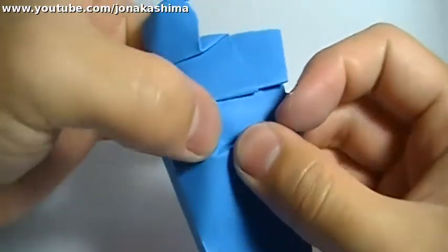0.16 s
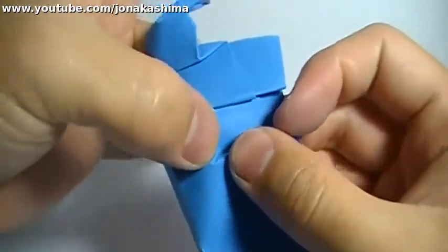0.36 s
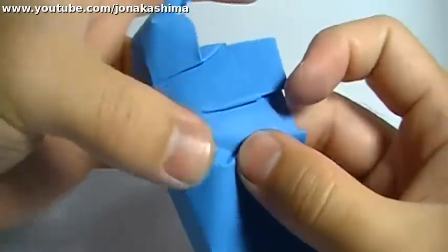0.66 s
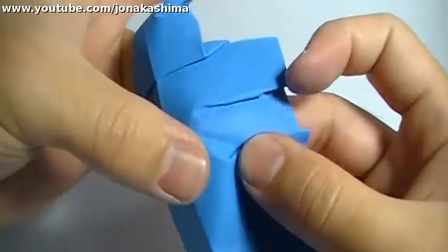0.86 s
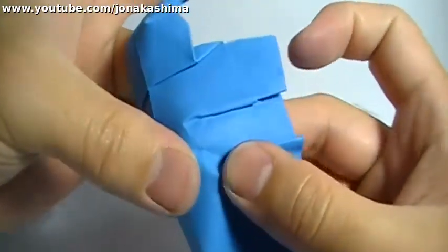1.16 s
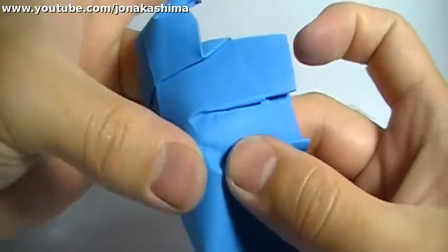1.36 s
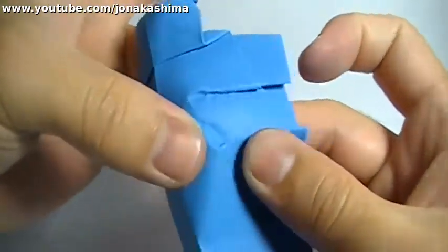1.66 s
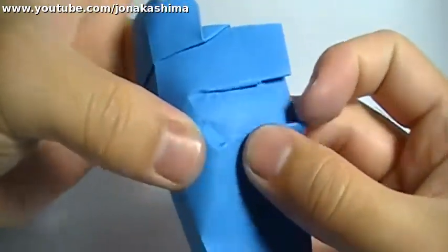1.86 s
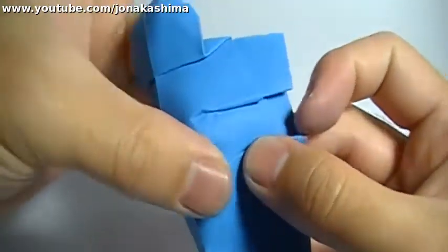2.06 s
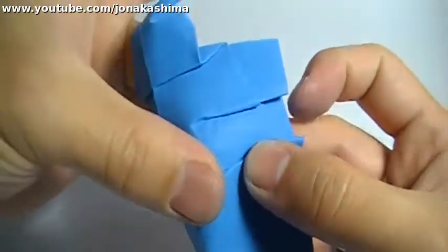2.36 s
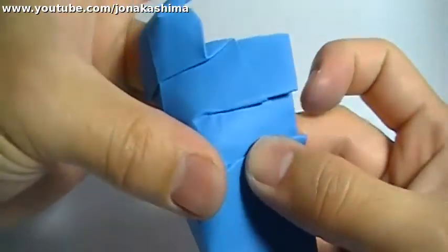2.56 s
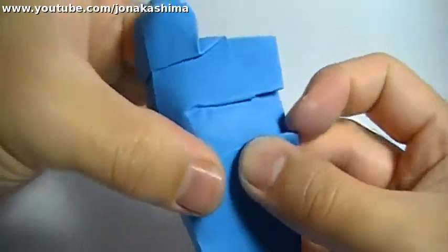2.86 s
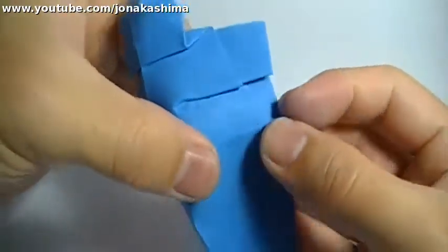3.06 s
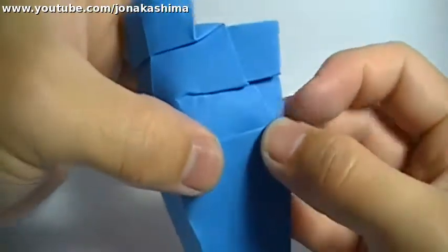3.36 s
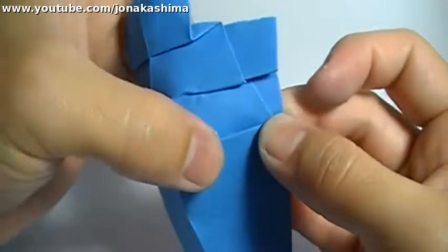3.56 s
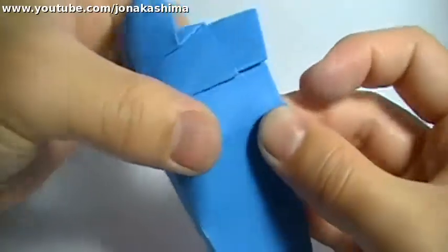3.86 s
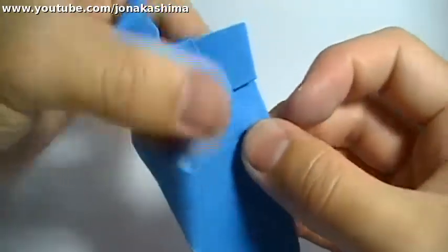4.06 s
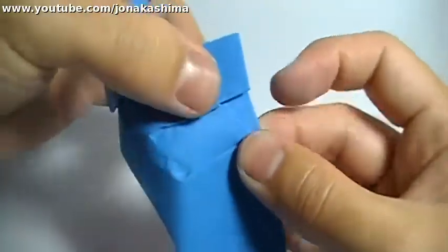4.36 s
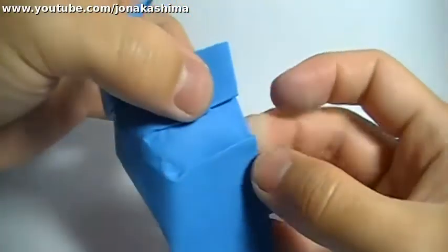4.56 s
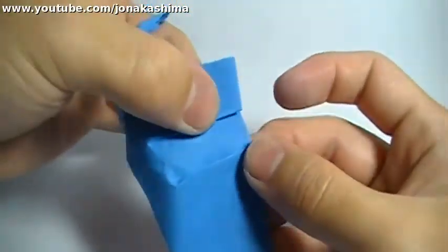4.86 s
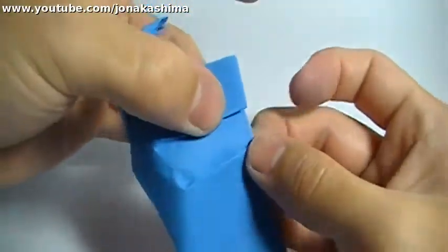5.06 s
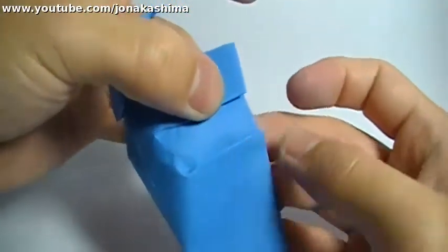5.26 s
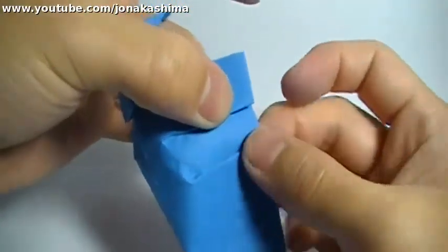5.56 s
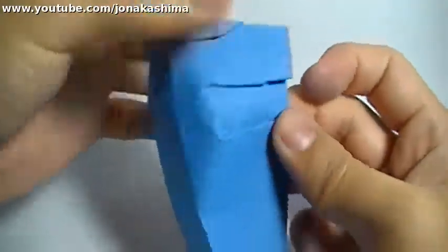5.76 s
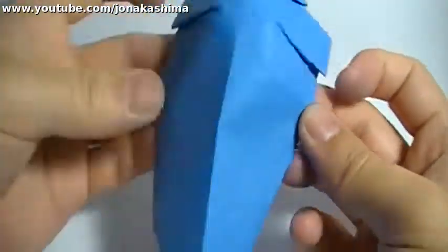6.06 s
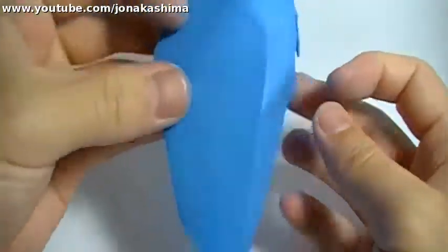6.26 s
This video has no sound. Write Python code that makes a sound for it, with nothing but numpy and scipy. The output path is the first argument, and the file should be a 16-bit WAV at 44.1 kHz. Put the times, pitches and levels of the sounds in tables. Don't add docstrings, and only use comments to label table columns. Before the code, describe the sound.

Close to a small stereo microphone in a quiet room, fingers work a hollow folded paper model. Short dry rubs and crinkles come in irregular clusters, with crisp snaps as creases buckle and tiny fibre ticks. Strong pops land near the middle, the sharpest about two thirds through, then rustling grows again at the end. A low, wide hiss stays underneath.

```python
import sys
import numpy as np
from scipy import signal
from scipy.fft import rfft, irfft
from scipy.io import wavfile

SR = 44100
rng = np.random.default_rng(int(sys.argv[2]) if len(sys.argv) > 2 else 0)


def put_to_file(sound):
    columns = np.atleast_2d(sound).T
    safe = np.clip(columns, -1, 1)
    whole_steps = np.round(safe * 32767)
    wavfile.write(sys.argv[1], SR, whole_steps.astype(np.int16))


def invert_db(x):
    u = np.asarray(x, float) / 20
    return 10 ** u


N = 282681

# start in seconds, length in seconds,
# skin hiss at landing in dB, skin hiss at lifting in dB, bending in dB.
EDGE_STROKES = [(0.56, 0.06, -62, -65, -11), (0.608, 0.084, -48, -55, -10), (4.427, 0.038, -51, -52, -8.5),
                (4.48, 0.042, -62, -59.5, -3.5), (0.876, .012, -37.5, -59, 11),
                (0.9, 0.056, -56.5, -48, -0.5), (1.545, 0.023, -73, -56, -6),
                (1.567, 0.033, -53.5, -64, -5.5), (1.9285, 0.003, -31.5, -67, 6),
                (2.81, 0.11, -55.5, -45, 3.5), (2.898, 0.072, -49, -45, -20), (2.974, 0.039, -47, -49, -8),
                (3.022, 0.034, -67, -59.5, -0.5), (6.038, 0.035, -52.5, -51, 3.5),
                (6.078, 0.024, -49, -53, 2), (6.114, 0.11, -56.5, -68, -0.5),
                (6.2, 0.14, -61.5, -52.5, -19), (6.358, 0.089, -58.5, -54, -8.5)]
# start in seconds, length in seconds,
# skin hiss at landing in dB, skin hiss at lifting in dB, bending in dB.
FACE_STROKES = [
    (0.026, 0.034, -47, -44, -4.5),
    (0.132, 0.074, -70, -65, -11),
    (0.513, 0.032, -57, -53, 1),
    (0.945, 0.041, -48, -50.5, 4),
    (4.39, 0.0037, -32, -56, 27.5),
    (4.396, 0.027, -43, -58, 9),
    (5.788, 0.18, -80.5, -53, 3),
    (2.454, 0.12, -76.5, -71, -22),
]
# start in seconds, length in seconds,
# skin hiss at landing in dB, skin hiss at lifting in dB, bending in dB.
FLAP_STROKES = [(0.696, 0.011, -48.5, -35, -4), (0.709, 0.034, -38.5, -44.5, -4),
                (0.9912, .007, -32, -48, 15), (0.997, 0.033, -81, -51.5, 7.5),
                (1.634, 0.018, -62.5, -39, 9.5), (1.661, 0.034, -40.5, -51, 0.5),
                (1.768, .02, -59.5, -54, -8), (1.78, 0.026, -50.5, -52, 7), (1.992, 0.048, -73, -63, -5),
                (2.037, 0.098, -66.5, -58, 0), (2.64, 0.05, -67, -58, -7), (2.715, 0.025, -47, -52.5, 2),
                (3.713, 0.075, -68, -50, 1), (3.816, 0.036, -47.5, -44, -3.5), (3.846, .05, -50, -59, -13),
                (3.961, 0.053, -66, -61, 0.5), (4.253, 0.055, -53.5, -62, -4.5),
                (4.299, 0.028, -72, -61, 2), (5.061, 0.03, -56.5, -63, 3), (5.096, .036, -67, -56.5, -8),
                (5.122, 0.026, -69, -59, 0.5), (5.68, 0.026, -55, -62, 8), (5.706, 0.019, -64, -50.5, 1)]
# start in seconds, length in seconds,
# skin hiss at landing in dB, skin hiss at lifting in dB, bending in dB.
PANEL_STROKES = [(3.138, 0.041, -99, -48.5, 1.5), (3.237, .116, -63, -62.5, -2.5),
                 (3.65, 0.035, -65, -60, -27), (3.8057, 0.01, -41, -57, 14.5),
                 (4.037, 0.11, -67.5, -60, -6.5), (4.116, 0.028, -57, -68, -6), (4.708, 0.058, -60, -52, 4),
                 (4.861, 0.026, -45.5, -56.5, 8.5), (4.907, .02, -62, -53, -7),
                 (4.929, 0.072, -57, -71.5, -5.5), (5.179, .01, -47, -40, 16), (5.19, 0.014, -35.5, -45, 6)]
# skin hiss peak in Hz, flap ring centre in Hz,
# then flaps, panels and walls, each in dB relative to the hiss.
PLACES = [
    (7620, 2220, 0.5, -3, -7),
    (4580, 2320, 1.5, -6.5, -12.5),
    (6630, 2330, 0.5, -7, -8.5),
    (6600, 2230, -1, -5.5, -10.5),
]
# share of the bending it takes, dB it lags per dB of faster sliding.
BODY_ANSWER = [
    (.4, 0.4),
    (.9, 0.84),
    (.9, 0.8325),
]
# frequency in Hz, width in Hz, level in dB.
SHEET = [(1149, 20.4, -1), (1282, 45.6, 6.5), (1640, 39, 5), (1754, 250, 2.5), (1827, 53, 3),
         (2153, 193, 3.5), (2200, 205, 4), (2460, 12, -25), (2700, 50, 0), (2924, 71, 1.5), (3560, 13, -1)]
# frequency in Hz, width in Hz, level in dB.
WALLS = [(60.4, 97, -6), (175, 38.5, 1), (350, 37, 3), (435, 197, -5), (615, 70, 3), (834, 40, -3)]
# frequency in Hz, width in Hz, level in dB.
FREE_EDGES = [(3820, 180, -2.5), (4860, 71, 12.5), (5400, 3600, -22.5), (7130, 150, 9.5), (8300, 330, -2)]
# frequency in Hz, level in dB.
SKIN_TONE = [(1760, -55.5), (3000, -4), (8380, -2), (10000, -2), (10600, -14), (11000, -76), (14300, -49),
             (22000, -120)]
# start in seconds, length in seconds,
# level in dB, centre in Hz.
FLEXES = [(0.124, 0.073, -74, 3060), (0.53, 0.027, -60, 440), (0.531, 0.023, -59.5, 200),
          (5.684, 0.034, -62, 5200), (0.705, 0.045, -53, 4200), (3.773, 0.02, -56, 500),
          (2.7235, 0.006, -38, 2250), (0.992, 0.008, -55, 1500), (4.408, 0.008, -47, 1650),
          (2.716, 0.014, -52, 4000), (6.255, 0.09, -58, 7600), (0.61, 0.04, -56, 8800),
          (4.9, 0.07, -60, 7200), (0.52, 0.02, -61, 2300), (2.83, 0.04, -54, 2200),
          (4.412, 0.011, -49, 2500), (0.55, 0.074, -62, 2800), (0.945, 0.018, -77, 2960),
          (1.089, 0.13, -70, 2870), (1.574, 0.03, -59, 173), (2.188, 0.21, -69, 175),
          (2.81, 0.075, -54, 1970), (2.979, 0.059, -51, 1700), (4.07, 0.095, -62, 5850),
          (4.288, 0.058, -56.5, 6100), (4.407, 0.0051, -43.5, 4600), (4.403, 0.012, -46, 1210),
          (0.839, 0.035, -68, 7140), (3.436, 0.032, -69.5, 2370), (3.799, 0.021, -56.5, 1100),
          (3.816, 0.021, -52, 2320), (5.185, 0.044, -55.5, 1200), (4.638, 0.025, -62.5, 380),
          (4.701, 0.083, -63, 1240), (5.059, 0.052, -63, 3040), (5.484, 0.03, -62, 1300),
          (5.713, 0.018, -59, 2880), (5.895, 0.075, -67, 145), (6.035, 0.04, -62, 144),
          (6.175, 0.12, -63, 3860)]
# time in seconds, peak in dB, ring centre in Hz,
# thump in dB relative to the ring, tick in dB relative to the ring.
DEEP_SNAPS = [(1.5831, -34, 2670, -7.5, -19), (1.9278, -27, 1670, -7, -7.5), (2.1919, -40, 2480, -32, -1),
              (2.337, -44.5, 2720, -27, -29), (2.7238, -16, 2300, -23.5, -50),
              (2.8787, -24, 1900, -28, -29), (2.8884, -26, 1650, -7, 4.5), (3.3455, -43, 1680, 4.5, 6),
              (5.2103, -19, 1980, -15, -7), (5.4633, -44.5, 1250, -4, -22), (6.0417, -38, 1730, -7, -9),
              (6.0574, -44, 1730, 1, 1)]
# time in seconds, peak in dB, ring centre in Hz,
# thump in dB relative to the ring, tick in dB relative to the ring.
WALL_SNAPS = [(0.0315, -34.5, 2570, -11, 13), (0.5353, -39, 2640, -24, -9), (0.5436, -31, 2730, -5, -10),
              (0.9436, -37, 2900, 4, -3), (1.024, -35.5, 2620, -2.5, -1), (1.4015, -41.5, 1550, -41, -11),
              (1.5383, -39, 2500, -10, -39), (2.0403, -37.5, 2780, -13, -2.5),
              (2.2677, -46, 1280, 2.5, -22), (3.938, -42.5, 1710, -2.5, 8.5), (4.0062, -37, 1240, -30, 1.5),
              (4.3026, -41, 1180, -25, 1.5), (4.3934, -20, 2200, -32, -2), (5.686, -31, 1930, -11, 2.5),
              (5.873, -51, 1640, 8, 3), (5.9409, -41, 1260, 2.5, 1), (6.0991, -34, 1740, -27, -20)]
# time in seconds, peak in dB, ring centre in Hz,
# thump in dB relative to the ring, tick in dB relative to the ring.
TIGHT_SNAPS = [(0.8754, -36, 1280, 2, 14.5), (0.9922, -20, 2840, -19, -5), (1.1378, -36.5, 1690, -8, -12),
               (1.6471, -29.5, 2460, -4.5, -28), (1.8684, -47, 1740, -8, 4.5), (2.7095, -35, 1740, -13, -2),
               (3.8046, -18, 1200, -13.5, -27), (4.4071, -12.5, 2470, -22.5, -28),
               (4.6515, -40, 1650, -4, -27), (4.8688, -31.5, 1290, -21, -16),
               (5.1828, -27.5, 1370, -5.5, 2.5), (5.3463, -40.5, 1450, -4, 2),
               (5.4854, -31, 1500, -12, -38), (6.0719, -48, 1270, -20, 5), (6.141, -36, 1720, -5, 2)]
# time in seconds, peak in dB.
FIBRE_TICKS = [(0.673, -36), (1.0815, -51), (1.168, -38.5), (1.2818, -45), (1.8936, -54), (2.0276, -38),
               (2.0966, -35), (2.131, -39), (2.2235, -38), (2.59, -43), (3.4167, -43.5), (3.9648, -33),
               (4.4083, -11), (5.2116, -18), (3.8046, -20.5), (1.93, -26), (0.9933, -29), (0.9943, -20),
               (2.9015, -33), (2.8145, -41), (2.844, -28), (0.523, -43), (0.6128, -42), (0.7085, -34),
               (0.59, -44), (0.742, -36), (6.0715, -33), (5.875, -42), (6.33, -40), (3.853, -36),
               (4.764, -42), (1.571, -42), (3.1844, -38), (4.259, -40), (4.395, -20), (5.0683, -43),
               (5.716, -40), (6.142, -42), (2.965, -33), (3.002, -33), (5.9744, -50)]
# time in seconds, faint rustle in dB.
GRIP_RUSTLE = [(0.0, -57.5), (0.19, -69), (0.5, -63.5), (1.0, -60.5), (1.41, -66.5), (1.86, -62.5),
               (2.64, -64), (2.87, -56), (3.43, -66), (3.69, -65), (3.93, -63.5), (4.4, -67), (5.0, -61),
               (5.43, -67.5), (6.14, -55.5), (6.41, -59)]
# frequency in Hz, level in dB.
RUSTLE_TONE = [(410, -24.5), (700, -5.5), (2670, -4), (3470, -10.5), (7520, -10.5), (10450, -17),
               (11000, -37), (14300, -43), (22000, -120)]
# middle in seconds, length in seconds, level in dB.
HUMS = [
    (0.0, 0.026, -68),
    (1.2, 0.55, -64),
    (2.272, 0.38, -65.5),
    (2.912, 0.74, -69),
    (3.962, 0.092, -69),
    (4.806, 0.31, -64),
    (5.918, 0.15, -59.5),
    (6.3, .3, -69),
]
# frequency in Hz, level in dB.
HISS_MID_TONE = [(15, -63), (25, -12.5), (101, -5), (178, -6.5), (819, -13), (1080, -20.5), (1400, -12),
                 (9680, -50.5), (11000, -40), (14300, -81), (22000, -120)]
# frequency in Hz, level in dB.
HISS_SIDE_TONE = [(15, -49), (25, -20), (156, -6), (518, -8), (1510, -17), (6440, -33.5), (7510, -35),
                  (9200, -34), (11000, -44), (14300, -94), (22000, -120)]


def rms_one(x):
    return x / np.sqrt(np.mean(x ** 2) + 1e-20)


def colour(x, tone):
    hz, level_db = np.transpose(tone)
    grid = np.maximum(np.fft.rfftfreq(4096, 1 / SR), 1)
    outline_db = np.interp(np.log(grid), np.log(hz), level_db)
    cepstrum = irfft(np.log(invert_db(outline_db)))
    cepstrum[1:2048] *= 2
    cepstrum[2049:] = 0
    response = irfft(np.exp(rfft(cepstrum)))
    return signal.fftconvolve(x, response)[:len(x)]


def resonate(x, modes, spread_db=0):
    out = 0
    own_levels_db = spread_db + np.zeros(len(modes))
    for k, ((hz, width_hz, level_db), own_db) in enumerate(zip(modes, own_levels_db)):
        r = np.exp(-np.pi * np.clip(width_hz, 5, 2000) / SR)
        b = (1 - r * r) / 2 * np.array([1, 0, -1])
        a = [1, -2 * r * np.cos(2 * np.pi * hz / SR), r * r]
        out = out + (-1) ** k * invert_db(level_db + own_db) * signal.lfilter(b, a, x)
    return out


def near(modes, centre_hz, fall_db):
    return -fall_db * np.log2(np.array(modes)[:, 0] / centre_hz) ** 2


def bright(x):
    return colour(1.42 * x + resonate(x, FREE_EDGES), SKIN_TONE)


def drift(rate_hz):
    r = np.exp(-2 * np.pi * rate_hz / SR)
    wander = signal.lfilter([1], [1, -2 * r, r * r], rng.standard_normal(N + SR))
    return rms_one(wander[SR:])


def grains(per_s, uneven_db, clump_db):
    sizes = invert_db(uneven_db * np.minimum(rng.exponential(1, N), 5)) * rng.choice([-1, 1], N)
    slipping = rng.random(N) < per_s / SR
    return rms_one(sizes * slipping * invert_db(clump_db * drift(48)))


def strokes():
    slips = grains(9000, uneven_db=3.0, clump_db=1.7)
    slips += 0.38 * grains(250, uneven_db=3.5, clump_db=3.0)
    ragged = invert_db(1.4 * np.array([drift(22) for layer in range(4)]))
    wall_slips = grains(2500, uneven_db=3.0, clump_db=1.5)
    wall_sound = rms_one(resonate(wall_slips, WALLS[1:]))
    panel_modes = SHEET[:2] + [(1230, 1180, -5.5)]
    flap_modes = SHEET[2:] + [(2460, 390, -3.0)]
    out, skin = flexes(slips), 0
    tables = EDGE_STROKES, FACE_STROKES, FLAP_STROKES, PANEL_STROKES
    for rows, (skin_hz, flap_hz, *body_db) in zip(tables, PLACES):
        gains = pressure(rows, body_db) * ragged
        hiss, flaps, panels, walls = signal.lfilter([0.008], [1, -0.992], gains)
        skin_slips = slips + resonate(slips, [(skin_hz, 1100, 3.0)])
        skin = skin + hiss * rms_one(bright(skin_slips))
        out += walls * wall_sound
        flap_lean_db = near(flap_modes, flap_hz, fall_db=37.0)
        for gain, modes, lean_db in ((flaps, flap_modes, flap_lean_db), (panels, panel_modes, 0)):
            usual = np.std(resonate(slips[:2 * SR], modes, lean_db))
            out += resonate(gain * slips, modes, lean_db) / usual
    return out + patchy(skin)


def pressure(rows, body_db):
    usual_hiss_db, lift_db_per_s = -53.5, 810
    takes, lags = np.transpose(BODY_ANSWER)[:, :, None]
    gains = np.full((4, N), 1e-10)
    for s, length, land_db, lift_db, bend_db in rows:
        span = slice(round(s * SR), min(round((s + length + 0.12) * SR), N))
        age = np.arange(span.start, span.stop) / SR - s
        slide_db = np.interp(age, [0, length], [land_db, lift_db])
        rest_db = np.array(body_db)[:, None] + takes * bend_db - lags * (slide_db - usual_hiss_db)
        fading_db = slide_db - lift_db_per_s * np.maximum(age - length, 0)
        layers_db = fading_db + np.vstack([0 * age, rest_db])
        gains[:, span] = np.maximum(gains[:, span], invert_db(layers_db))
    return gains


def flexes(slips):
    out, modes = np.zeros(N), WALLS + SHEET
    for s, length, level_db, centre_hz in FLEXES:
        at = round(s * SR)
        age = np.arange(min(round((length + 0.05) * SR), N - at)) / SR
        swell = np.sin(np.pi * np.minimum(age / length, 1))
        x = slips[at:][:len(age)] * swell
        ring = resonate(x, modes, near(modes, centre_hz, fall_db=37.0))
        ring += resonate(x, [(centre_hz, 0.22 * centre_hz, -1.0)])
        damped_db = level_db - 2000 * np.maximum(age - length, 0)
        out[at:][:len(age)] += invert_db(damped_db) * rms_one(ring)
    return out


def patchy(x):
    patches_hz = 3600, 4700, 5800, 6900, 8000, 9200
    return x + 0.27 * sum(drift(13.8) * resonate(x, [(hz, 1000, 0)]) for hz in patches_hz)


def snaps():
    length, give = round(0.09 * SR), round(0.0013 * SR)
    age = np.arange(length) / SR
    out = np.zeros(N + length)
    kinds = (DEEP_SNAPS, 175), (WALL_SNAPS, 390), (TIGHT_SNAPS, 600)
    events = sorted((*row, hz) for rows, hz in kinds for row in rows)
    crackles = rng.standard_normal((len(events), length))
    strengths = rng.standard_normal((len(events), len(SHEET)))
    soften = signal.butter(1, 4200, fs=SR)
    for event, crackle, own in zip(events, crackles, strengths):
        s, peak_db, ring_hz, thump_db, tick_db, thump_hz = event
        kick = 0.15 * crackle * invert_db(-60 * age / 0.051)
        kick[:give] *= 0.6
        kick[give] += 3.2
        ring = resonate(kick, SHEET, 2.25 * own + near(SHEET, ring_hz, fall_db=20.0))
        ring += resonate(kick, [(ring_hz, 0.65 * ring_hz, -4.0)])
        ring = signal.lfilter(*soften, ring)
        ring *= invert_db(-60 * age / 0.036)
        thump = resonate(kick, WALLS, near(WALLS, thump_hz, fall_db=15.0))
        thump += resonate(kick, [(thump_hz, 0.44 * thump_hz, 1.5)])
        thump *= invert_db(-60 * age / 0.034)
        parts = [(ring, 0), (thump, thump_db + 4.0), (bright(kick), tick_db + 0.5)]
        at = round(s * SR)
        out[at:at + length] += sum(invert_db(peak_db + db - 3.0) * p / np.abs(p).max() for p, db in parts)
    return signal.sosfilt(signal.butter(2, 110, "high", fs=SR, output="sos"), out[:N])


def ticks():
    s, peak_db = np.transpose(FIBRE_TICKS)
    clicks = np.zeros(N)
    for lag_s, loss_db in ((0, 1.2), (0.0004, 3.0)):
        clicks[((s + lag_s) * SR).astype(int)] = invert_db(peak_db - loss_db + 4.0)
    clicks = clicks + 1e-18
    return bright(clicks) + resonate(clicks, [(2260, 900, 4.1)])


def grip():
    time = np.arange(N) / SR
    rustle_db = np.interp(time, *np.transpose(GRIP_RUSTLE))
    rustle = rms_one(colour(grains(5000, uneven_db=-1.5, clump_db=1.5), RUSTLE_TONE))
    middle, length, level_db = np.transpose(HUMS)[:, :, None]
    away = np.maximum(np.abs(time - middle) - length / 2, 0)
    hum_db = np.max(level_db - 37 * away, axis=0)
    hollow_hz, hollow_width_hz = 432, 50
    hum = rms_one(resonate(rng.standard_normal(N), [(hollow_hz, hollow_width_hz, 0)]))
    return invert_db(rustle_db - 2.5) * rustle + invert_db(hum_db - 1.5 + 2 * drift(12)) * hum


def nearby(x):
    mid_t60_s, side_t60_s = 0.045, 0.02
    mid_db, side_db = -14, -17
    age = np.arange(round(0.12 * SR)) / SR
    tails = rng.standard_normal((2, len(age))) * invert_db(-60 * age / [[mid_t60_s], [side_t60_s]])
    tails *= age > 0.0005
    tails /= np.sqrt(np.sum(tails ** 2, axis=1, keepdims=True))
    mid, side = signal.fftconvolve(x[None], tails, axes=1)[:, :N]
    side = invert_db(side_db) * side + resonate(side, [(9600, 600, -1.0), (1240, 500, -8.0)])
    side *= drift(30)
    return invert_db(mid_db) * mid + side * [[1], [-1]]


def microphone_hiss():
    mid_db, side_db, whine_db = -67, -57.5, -80.0
    whine_hz, whine_width_hz = 1440, 24
    mid = invert_db(mid_db) * rms_one(colour(rng.standard_normal(N), HISS_MID_TONE))
    side = invert_db(side_db) * rms_one(colour(rng.standard_normal(N), HISS_SIDE_TONE))
    whine = rms_one(resonate(rng.standard_normal(N), [(whine_hz, whine_width_hz, 0)]))
    return mid + invert_db(whine_db) * whine + side * [[1], [-1]]


def scene():
    paper = strokes() + snaps() + ticks() + grip()
    left_lead_db = 1.2
    pan = invert_db(np.array([[0.5], [-0.5]]) * left_lead_db)
    return pan * (paper + nearby(paper) + microphone_hiss())


def band_limit(x):
    return signal.sosfilt(signal.butter(12, 11160, fs=SR, output="sos"), x)


def record(dry):
    top_cut = signal.cheby2(14, 70, 1.06 * 10780, fs=SR, output="sos")
    mix = signal.sosfilt(top_cut, dry)
    return band_limit(mix)


dry = scene()
out = record(dry)
put_to_file(out)
```